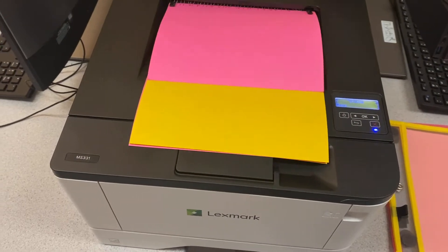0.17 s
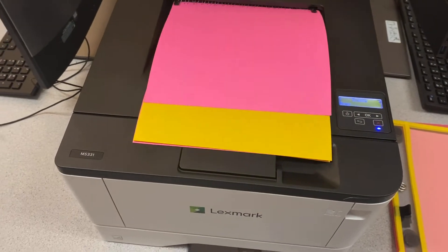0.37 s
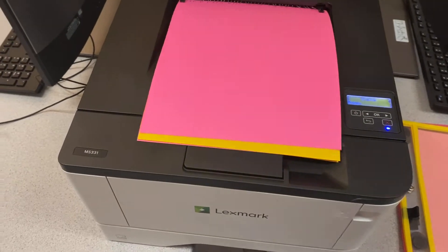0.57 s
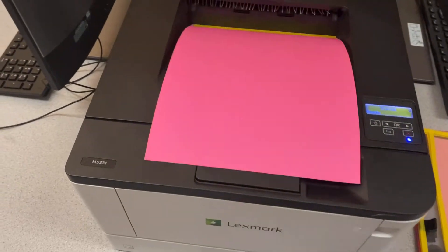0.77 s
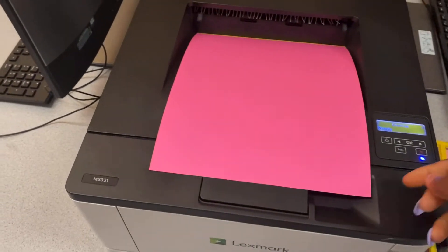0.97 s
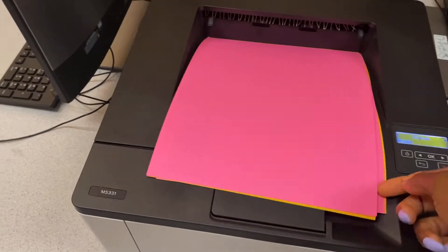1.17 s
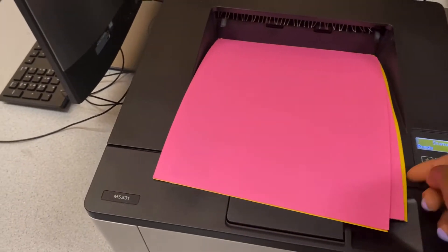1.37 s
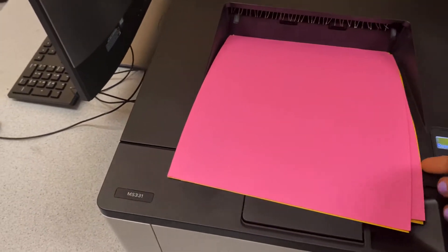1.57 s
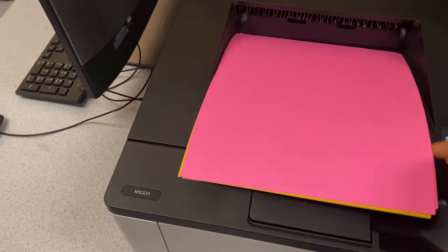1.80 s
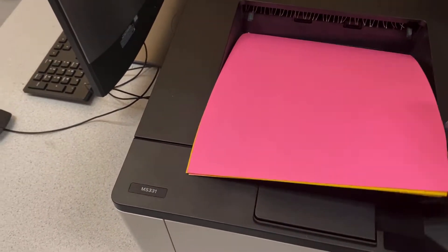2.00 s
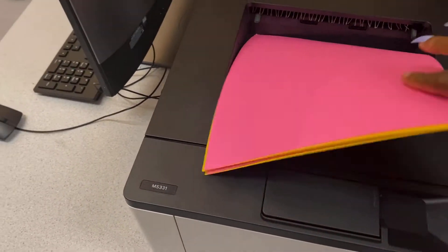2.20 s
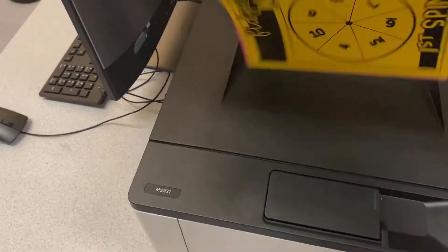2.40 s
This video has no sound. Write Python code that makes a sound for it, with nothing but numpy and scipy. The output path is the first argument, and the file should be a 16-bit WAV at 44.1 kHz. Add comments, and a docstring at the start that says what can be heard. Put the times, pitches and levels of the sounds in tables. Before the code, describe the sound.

Printer rumble and rattle with hard plastic clacks, fading into a thin falling motor whine

```python
"""Laser printer pushing out its last sheet, a short way from a phone with two microphone ports.
Noise through low resonances makes the gears' rumble in the plastic case, shaped noise the rattle and hiss;
blows on resonances make the latch clacks and paper snaps, and noise swells a hand brushing the paper.
The drive dies down while the mirror motor's whine, a pair of sines, coasts down in pitch.
Mains hum and low room noise stay underneath."""
import sys
import numpy as np
from scipy import signal
from scipy.fft import rfft, irfft, next_fast_len
from scipy.io import wavfile
from scipy.ndimage import uniform_filter1d

SR = 44100
rng = np.random.default_rng(int(sys.argv[2]) if len(sys.argv) > 2 else 0)


def int16_out(signal):
    """Quantize to a 16-bit WAV file."""
    q = np.round(np.clip(np.atleast_2d(signal).T, -1, 1) * 32767)
    wavfile.write(sys.argv[1], SR, q.astype(np.int16))


N = 107912
POWER_OFF_S = 0.96  # the drive electronics switch off


def undb(db):
    """Turn dB into an amplitude gain."""
    return 10 ** (np.asarray(db) / 20)


def unit(x):
    """Scale to rms 1."""
    return x / np.sqrt(np.mean(x ** 2) + 1e-20)


def noise():
    """White noise as long as the scene."""
    return rng.standard_normal(N)


def sine(phase):
    """Sine of rms 1."""
    return np.sqrt(2) * np.sin(phase)


def colour(x, table):
    """Shape the spectrum through (hz, db) points, joined over log frequency; -90 dB outside them."""
    hz, db = np.array(table).T
    f = np.fft.rfftfreq(len(x), 1 / SR) + 1  # 1 Hz up, to keep the log finite
    gain = undb(np.interp(np.log(f), np.log(hz), db, left=-90, right=-90))
    return irfft(rfft(x) * gain, len(x))


def ring(x, hz, width):
    """Two-pole resonance, width in Hz, gain 1 at the centre."""
    return signal.lfilter(*signal.iirpeak(hz, hz / width, SR), x)


def double_ring(x, hz, width):
    """A resonance followed by another twice as wide, for steeper skirts."""
    return ring(ring(x, hz, width), hz, 2 * width)


def walk(rate):
    """Random levels, rate of them per second, slewed smoothly into each other; spread near 1."""
    k = int(SR / rate)
    held = np.repeat(rng.standard_normal(N // k + 1), k)
    return 1.08 * uniform_filter1d(uniform_filter1d(held, k), k)[:N]


def band(x, low_hz, high_hz):
    """Band-pass the treble."""
    return signal.sosfilt(signal.butter(2, (low_hz, high_hz), "band", fs=SR, output="sos"), x)


def voices(body, air, row, sharp):
    """Three resonances and two treble bands, each with its level's energy over 20 ms."""
    hz1, db1, hz2, db2, hz3, db3, crack_db, sizzle_db = row
    parts = [double_ring(body, hz, max(hz / sharp, 60)) for hz in (hz1, hz2, hz3)]  # at least 60 Hz wide
    parts += [band(air, 2800, 7000), band(air, 7000, 13000)]  # crack, sizzle
    levels_db = [db1, db2, db3, crack_db, sizzle_db]
    return sum(undb(db) * p / np.sqrt(np.sum(p ** 2) / (SR / 50)) for p, db in zip(parts, levels_db))


def drive(t):
    """Gears excite the case's low resonances and a broad grainy rattle; air and paper hiss above."""
    # drive train: start_s, rumble_db, rattle_db, hiss_db (rms before flicker)
    drive_levels = [(0, -39.5, -44.5, -47.5), (.19, -43.5, -40.5, -46.5), (.56, -42.5, -46, -48.5),
                    (.76, -46.5, -46, -53), (.96, -47.5, -54.5, -57), (1.1, -58, -54.5, -56),
                    (1.451, -57.5, -58, -64.5), (1.751, -67.5, -60, -65), (2.11, -55, -58, -65),
                    (2.44, -65, -62, -66.5)]
    # case resonances: pitch_hz, width_hz, level_db (relative)
    case_modes = [(225.6, 52, -5), (300, 46, 2.5), (336.7, 54, -3), (610.2, 15, -11.5), (880, 30, -21)]
    # rattle spectrum: frequency_hz, density_db (relative, per Hz)
    rattle_curve = [(300, -26), (480, 2.5), (730, 0), (1230, 0.5), (2220, -1), (3000, -8), (4500, -10)]
    # hiss spectrum: frequency_hz, density_db (relative, per Hz)
    hiss_curve = [(1650, -72.5), (2800, -12), (6100, -10.5), (8150, -15), (10900, -16.5), (16500, -26)]
    grain_db, flicker_db = 2.5, 0.8

    rumble = sum(undb(db) * unit(double_ring(noise(), hz, width)) for hz, width, db in case_modes)
    rattle = colour(noise() * undb(grain_db * walk(300)), rattle_curve)
    hiss = colour(noise(), hiss_curve)

    start_s, *levels_db = np.array(drive_levels).T
    shared = walk(15.74)  # all three layers flicker partly together
    out = np.zeros(N)
    for layer, db in zip((rumble, rattle, hiss), levels_db):
        flicker = flicker_db * (shared + walk(28.38))
        out += unit(layer) * undb(np.interp(t, start_s, db) + flicker)
    return out


def add(out, s, x):
    """Mix x in from time s."""
    i = int(s * SR)
    out[i:i + len(x)] += x[:N - i]


def knocks(table, sharp, tail_db, crack, force):
    """A blow rings the struck part; a decaying rattle with a weaker tail follows."""
    rise_s, tail_s = 0.00031, 0.02
    out, t = np.zeros(N), np.arange(SR // 5) / SR
    for s, *row, rattle_s in table:
        decay = np.exp(-t / rattle_s) + undb(tail_db) * np.exp(-t / tail_s)
        env = (1 - np.exp(-t / rise_s)) * decay
        rattle = env * rng.standard_normal(len(t))
        blow = force * np.sqrt(np.sum(env ** 2)) * (t == 0)  # one-sample impulse
        # crack: share of the blow that reaches the treble
        add(out, s, voices(rattle + blow, rattle + crack * blow, row, sharp))
    return out


def clacks():
    """Latches strike the printer's case, which rings sharply."""
    # start_s, pitch1_hz, level1_db, pitch2_hz, level2_db, pitch3_hz, level3_db,
    # crack_db, sizzle_db, rattle_s (decay)
    clack_rows = [(.049, 725, -30, 799, -30, 1760, -28, -34, -33.5, 0.0047),
                  (.052, 145, -41.5, 1317, -33, 2250, -36.5, -33, -60, 0.0038),
                  (.171, 900, -60, 1980, -67, 5230, -46.5, -51, -42.5, 0.0095),
                  (.209, 774, -25.5, 880, -21.5, 1436, -24, -24, -33.5, 0.013),
                  (.214, 299, -20.5, 1145, -29, 1787, -25.5, -25, -61, 0.016),
                  (.221, 87, -32.5, 199, -28, 1390, -32.5, -48, -52, 0.022),
                  (.594, 300, -47, 680, -45.5, 2080, -42.5, -50, -52, 0.004),
                  (.658, 300, -53, 2790, -49, 5370, -51, -32, -35, 0.0072),
                  (.673, 549, -35, 1340, -41.5, 2110, -48, -45, -46, 0.00073),
                  (.711, 300, -53, 990, -60, 5500, -56, -49, -68, .003),
                  (.728, 300, -50, 3000, -50, 5100, -47.5, -46.5, -51, 0.0038)]
    return knocks(clack_rows, sharp=10, tail_db=-15.5, crack=0.15, force=0.73)


def snaps():
    """Paper snaps: a harder blow on duller resonances, with a fainter tail."""
    # start_s, pitch1_hz, level1_db, pitch2_hz, level2_db, pitch3_hz, level3_db,
    # crack_db, sizzle_db, rattle_s (decay)
    snap_rows = [(1.968, 394, -59, 1468, -51.5, 2280, -50, -51, -59, 0.0011),
                 (2.09, 300, -65, 740, -52, 1570, -53.5, -55, -53, 0.00066),
                 (2.117, 900, -62, 1820, -60, 4600, -61, -50, -62, 0.0011),
                 (2.1248, 1530, -36, 1900, -33, 2170, -33, -28, -48.5, 0.001),
                 (2.147, 566, -48.5, 835, -46.5, 1980, -61, -48.5, -46, 0.00067),
                 (2.161, 520, -45, 750, -44, 1250, -69, -55, -58, 0.0017),
                 (2.178, 485, -67, 740, -43.5, 1150, -45, -52.5, -59, 0.0039),
                 (2.186, 612, -44, 787, -49, 1270, -72, -55, -75, 0.0058),
                 (2.233, 910, -76, 1800, -67, 5000, -72, -77, -58.5, 0.00084)]
    return knocks(snap_rows, sharp=5, tail_db=-28, crack=0.58, force=2.1)


def motor(t):
    """Clean lines that fall as the mirror coasts, and a thin electronic tone until power-off."""
    # mirror motor: time_s, pitch_hz, level_db (rms before waver)
    whine_track = [(.62, 2614, -55), (0.934, 2623, -53), (1.041, 2440, -48.5), (1.121, 2362, -54.5),
                   (1.18, 2292, -50.5), (1.409, 2073, -55), (1.456, 2040, -64), (1.52, 1988, -55.5),
                   (1.74, 1799, -60.5), (1.92, 1678, -64), (2.11, 1546, -58), (2.44, 1385, -71.5)]
    time_s, pitch_hz, level_db = np.array(whine_track).T
    phase = 2 * np.pi * np.cumsum(np.interp(t, time_s, pitch_hz)) / SR

    whine_db = np.interp(t, time_s, level_db, left=-63.5)  # quieter before it stands out
    whine = undb(whine_db + 2.5 * walk(34.96)) * sine(phase)

    low_db = -59.5 - 60 * np.maximum(t - POWER_OFF_S, 0)  # dies at 60 dB per second
    low = undb(low_db + 4.3 * walk(10.2)) * sine(0.4 * phase)  # partner line at 0.4 of the whine

    powered = (t > 0.27) * (t < POWER_OFF_S)
    high = undb(-66 + 3.4 * walk(6.2)) * sine(2 * np.pi * 12545 * t) * powered
    return whine + low + high


def brushes():
    """Skin scraping over paper: grainy noise swells through broad resonances."""
    # middle_s, half_length_s, pitch1_hz, level1_db, pitch2_hz, level2_db, pitch3_hz, level3_db,
    # crack_db, sizzle_db
    brush_rows = [(1.031, 0.015, 534, -51.5, 890, -50, 1920, -50, -62, -69),
                  (1.197, 0.018, 334, -38, 540, -51.5, 1080, -52, -48, -55),
                  (1.358, 0.027, 342, -58, 990, -54.5, 1650, -51, -51.5, -53),
                  (1.527, 0.05, 392, -45, 1040, -49, 2100, -48, -50.5, -56),
                  (1.632, 0.027, 430, -41, 780, -45, 1660, -46.5, -50.5, -53),
                  (1.861, 0.023, 300, -64, 805, -61.5, 2620, -53, -47, -55),
                  (1.926, 0.015, 300, -51, 710, -56, 2800, -60, -53, -58),
                  (2.127, 0.02, 386.3, -74, 744, -48.5, 1530, -53, -44.5, -51),
                  (2.185, 0.035, 396, -43, 750, -44.5, 1410, -82, -73, -78),
                  (2.244, 0.045, 300, -55.5, 880, -52, 1864, -56.5, -50.5, -54),
                  (2.316, 0.026, 300, -60, 1120, -50, 2100, -52.5, -48.5, -65),
                  (2.349, 0.011, 300, -64, 1110, -64, 2146, -57.5, -50.5, -50.5)]
    scrape_db, scrapes_per_s = 3.4, 500
    edge = 1.9  # the higher, the more abruptly a brush starts and stops
    out, grain = np.zeros(N), noise() * undb(scrape_db * walk(scrapes_per_s))
    for middle_s, half_s, *row in brush_rows:
        i = np.arange(int((middle_s - 3 * half_s) * SR), min(int((middle_s + 3 * half_s) * SR), N))
        swell = np.exp(-np.abs((i / SR - middle_s) / half_s) ** edge) * grain[i]
        out[i] += voices(swell, swell, row, sharp=2.98)
    return out


def room(t):
    """Wavering mains hum over low noise that starts stronger and soon settles."""
    # mains hum: pitch_hz, level_db (rms before waver)
    hum_lines = [(59.2, -57.5), (118.4, -63.5)]
    # low room noise spectrum: frequency_hz, level_db (relative)
    low_curve = [(25, -29), (49, -0.5), (124, -2.5), (220, -7.5), (290, -14.5), (480, -120)]
    hum = sum(undb(db + 1.5 * walk(12)) * sine(2 * np.pi * hz * t) for hz, db in hum_lines)
    low_db = -55 + 8.5 * np.exp(-t / 0.34)  # the extra level fades with a 0.34 s time constant
    return hum + undb(low_db) * unit(colour(noise(), low_curve))


def ports(x):
    """Two microphone ports hear one sound with their own delay and level; a blur differs between them."""
    # frequency_hz, phase_rad (left leads)
    port_phase = [(0, 0), (780, .65), (1460, .4), (5170, .7), (6900, 2.9), (8000, 3.5), (9730, 6.2),
                  (13100, 9.2), (15200, 11.5), (16500, 13.2)]
    # frequency_hz, balance_db (left minus right)
    port_balance = [(60, -1.5), (200, -4), (380, -5), (700, -9), (1290, 0.5), (2380, -4), (4400, -1.5),
                    (8120, 3.5), (15000, -3)]
    size = next_fast_len(N + 4096)
    f = np.fft.rfftfreq(size, 1 / SR)
    lead = np.interp(f, *np.array(port_phase).T)
    balance_db = np.interp(f, *np.array(port_balance).T)
    half = undb(balance_db / 2) * np.exp(0.5j * lead)  # each port takes half the difference

    count = SR // 10
    echo = rng.standard_normal(count) * np.exp(-np.arange(count) / (0.019 * SR))
    echo /= np.sqrt(np.sum(echo ** 2))
    blur = rfft(echo, size) * undb(-15) * np.minimum(f / 1500, 1)  # weaker below 1500 Hz

    spectrum = rfft(x, size)
    return np.array([irfft(spectrum * h, size)[:N] for h in (half + blur, 1 / half - blur)])


def scene():
    """Printer, hand, paper and room summed, then heard at the two ports."""
    t = np.arange(N) / SR
    return ports(drive(t) + clacks() + snaps() + motor(t) + brushes() + room(t))


def record(dry):
    """The phone's microphone dips near 4 kHz and cuts the top."""
    dip_hz, dip_width_hz, dip_share = 4255, 1140, 0.51
    wet = dry - dip_share * ring(dry, dip_hz, dip_width_hz)
    return signal.sosfilt(signal.ellip(8, 0.2, 70, 15900, fs=SR, output="sos"), wet)


dry = scene()
out = record(dry)
int16_out(out)
```